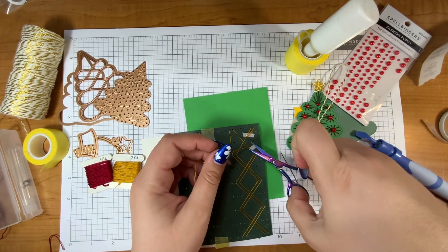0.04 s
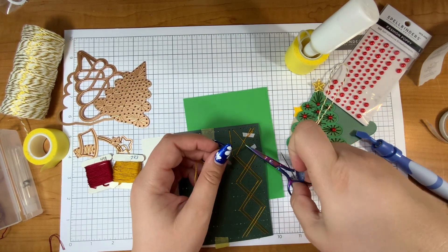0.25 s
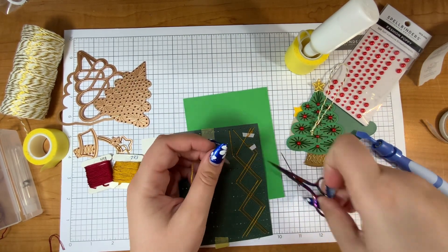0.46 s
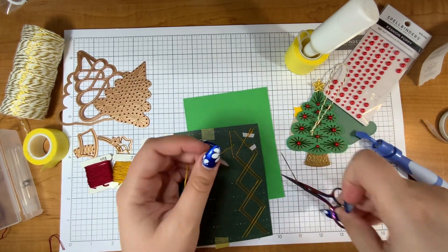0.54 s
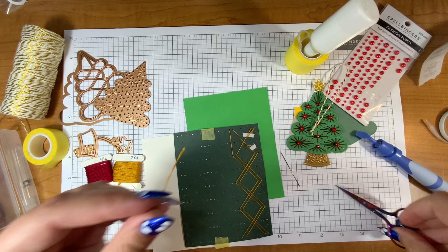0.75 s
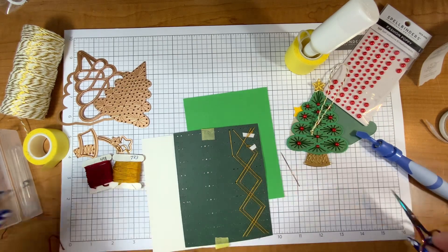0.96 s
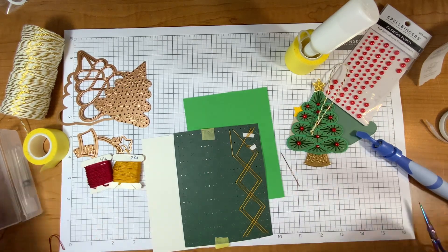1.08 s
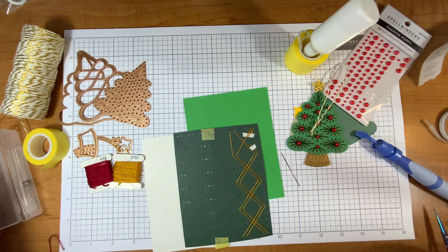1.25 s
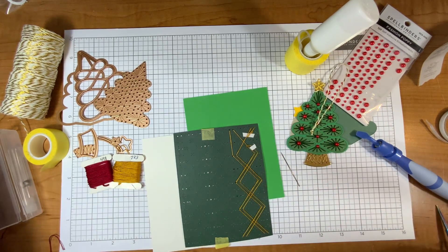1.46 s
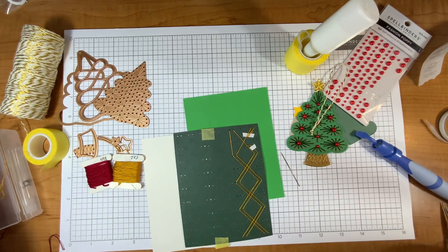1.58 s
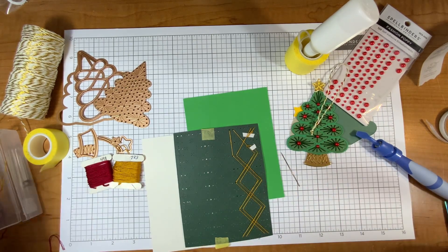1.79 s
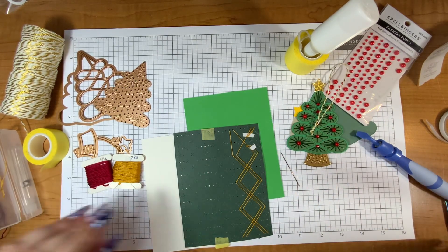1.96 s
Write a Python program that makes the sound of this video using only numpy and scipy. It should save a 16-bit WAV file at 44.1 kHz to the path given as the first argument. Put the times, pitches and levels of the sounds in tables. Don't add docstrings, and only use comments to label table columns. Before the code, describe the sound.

A sharp scissor snip, quiet dull bumps and faint paper rubbing lead to scissors dropped on a wooden craft table, clashing and rattling briefly; small indoor room, close microphone, low rumble and hiss, overloaded impact.

```python
import sys
import numpy as np
from scipy import signal
from scipy.fft import rfft, irfft
from scipy.io import wavfile
from scipy.ndimage import uniform_filter1d

SR = 44100
rng = np.random.default_rng(int(sys.argv[2]) if len(sys.argv) > 2 else 0)


def boost(x):
    u = np.asarray(x, float) / 20
    return 10 ** u


def log_audio(samples):
    frames = np.atleast_2d(samples).T
    limited = np.clip(frames, -1, 1)
    pcm = np.round(limited * 32767).astype(np.int16)
    wavfile.write(sys.argv[1], SR, pcm)


N = 89302

# t/s, tap level/dB, tap decay/s, top ring/dB, arm sway/dB
BUMPS = [(0.22, -45.5, 0.011, -51, -32.5), (0.428, -57, 0.018, -55.5, -43), (0.591, -54, 0.016, -51, -56),
         (0.65, -45.5, 0.0031, -36, -26.5), (0.329, -62, 0.0095, -66, -37.5),
         (0.756, -52.5, 0.012, -79, -33), (0.896, -66, 0.0099, -76, -42),
         (0.971, -45.5, 0.0056, -70, -52.5), (1.041, -27, 0.0052, -33.5, -21.5),
         (1.098, -41, 0.0067, -42, -48), (1.1833, -32.5, 0.0083, -38.5, -22.5),
         (1.296, -67, 0.0077, -49, -36), (1.337, -31.5, 0.0096, -34, -30.5),
         (1.342, -41.5, 0.011, -46, -38.5), (1.364, -43, 0.0035, -41.5, -29.5),
         (1.442, -43, 0.012, -46.5, -49), (1.464, -43.5, 0.0046, -52, -37), (1.54, -57, 0.015, -56, -35),
         (1.5826, -37.5, 0.0079, -47, -41.5), (1.596, -41, 0.018, -26.5, -34.5),
         (1.681, -30.5, 0.0068, -33.5, -24), (1.706, -27, 0.0073, -31, -48)]
# t/s, clash level/dB, decay/s, loudest pitch f/Hz, treble tilt/(dB/octave)
BOUNCES = [(1.719, -4.5, 0.0037, 4940, -0.5), (1.7213, -8, 0.004, 2920, -1),
           (1.732, 5.5, 0.0024, 7530, -3.5), (1.734, 0, 0.002, 2190, -4), (1.7388, -2, 0.0021, 2330, -3),
           (1.743, -13.5, 0.0033, 3040, -8), (1.7477, -17, 0.0022, 3800, 6), (1.753, -11, 0.003, 7100, 3),
           (1.75550, -3.5, 0.0021, 2300, -1), (1.7639, -12.5, 0.0039, 3040, -17),
           (1.7687, -6, 0.0041, 7560, -4), (1.778, -5.5, 0.0034, 3000, -5),
           (1.7870, -11.5, 0.0032, 2880, 0), (1.796, -13.5, 0.0035, 2000, -4),
           (1.804, -18, 0.0027, 1640, -9), (1.8062, -15, 0.0034, 1640, -11), (1.81, -22, 0.0082, 2130, -9),
           (1.817, -13.5, 0.0027, 2140, -22), (1.8237, -14.5, 0.0031, 1720, -12),
           (1.828, -17.5, 0.0025, 2370, -14), (1.831, -14, 0.0039, 2860, -11),
           (1.8374, -22.5, 0.0048, 2230, -16), (1.8433, -26.5, 0.0032, 2900, -11),
           (1.848, -24.5, .004, 2860, -9), (1.86, -48, 0.0025, 2400, -5), (1.864, -48, 0.0026, 1900, -7)]


def noise():
    return rng.standard_normal(N)


def colour(x, points):
    p, f = np.array(points, float), np.fft.rfftfreq(len(x), 1 / SR)
    gain_db = np.interp(np.log(f + 1), np.log(p[:, 0]), p[:, 1])
    return irfft(rfft(x) * boost(gain_db), len(x))


def unit(x):
    return x / np.sqrt(np.mean(x ** 2))


def band(x, hz, width_hz):
    return signal.lfilter(*signal.iirpeak(min(hz, 0.45 * SR), hz / width_hz, SR), x)


def ring(x, hz, t60_s):
    pole = np.exp((2j * np.pi * hz - np.log(1000) / t60_s) / SR)
    return signal.lfilter([1], [1, -pole], x).imag


def knocks(times_s, levels_db):
    x = np.zeros(N)
    np.add.at(x, (np.array(times_s) * SR).astype(int), boost(np.array(levels_db)))
    return x


def burst(start_s, decay_s, level_db):
    u = (np.arange(N) / SR - start_s) / decay_s
    rise = 1 - np.exp(-12 * np.abs(u))
    return boost(level_db) * (u > 0) * rise * np.exp(-np.abs(u))


def grit(spread_db, size):
    steps = boost(spread_db * rng.standard_normal(N // size + 1))
    return unit(steps.repeat(size)[:N])


def resonant(modes, gate=1):
    n, out = noise(), 0
    for k, (hz, width_hz, db) in enumerate(modes):
        steady = band(band(n, hz, width_hz), hz, width_hz)
        gated = band(band(gate * n, hz, width_hz), hz, width_hz)
        out = out + (-1) ** k * boost(db) * gated / np.std(steady)
    return out / np.sqrt(sum(boost(2 * db) for _, _, db in modes))


def hiss():
    # f/Hz, density/(dB/Hz)
    spectrum = [(20, -9), (45, 7.5), (80, 3), (160, -9.5), (290, -14), (600, -22.5), (1230, -24.5),
                (15400, -33)]
    return boost(-45) * unit(colour(noise(), spectrum))


def room(x):
    level_db, delay_s = -8.5, 0.004
    low_t60_s, high_t60_s = 0.31, 0.12
    late_db, late_t60_s = -13, 0.44
    t = np.arange(SR // 2) / SR
    n = rng.standard_normal(len(t))
    low = colour(n, [(4000, -21.0), (9000, -7.0)])
    near = low * boost(-60 * t / low_t60_s) + (n - low) * boost(-60 * t / high_t60_s)
    far = colour(n, [(500, 7.5), (3000, -3.5), (9800, -5), (11000, -42)])
    tail = (near + boost(late_db - 60 * t / late_t60_s) * far) * (t > delay_s)
    return boost(level_db) * signal.fftconvolve(x, tail / np.sqrt(np.sum(tail ** 2)))[:N]


def slide():
    # t/s, level/dB
    strokes = [(.38, -80), (.44, -83), (.52, -95), (.62, -61), (.8, -75), (1.0, -73), (1.1, -56),
               (1.3, -55.5), (1.449, -59), (1.548, -61), (1.698, -62), (2.0, -81)]
    flicker_db = 2 * unit(uniform_filter1d(noise(), size=500))
    p = np.array(strokes)
    level_db = np.interp(np.arange(N) / SR, p[:, 0], p[:, 1], left=-90) + flicker_db
    return boost(level_db) * resonant([(1754, 480, 0), (2900, 1200, -5), (900, 700, -9)])


def arm_sway():
    # t/s, level/dB
    drop_shoves = [
        (1.717, -18),
        (1.735, -23.5),
        (1.752, -32),
        (1.89, -33.5),
        (1.943, -42.5),
    ]
    hz, tau_s, onset = 42.35, 0.027, 1.55
    shoves = np.array([(b[0], b[4]) for b in BUMPS] + drop_shoves)
    push = knocks(*shoves.T)
    t = np.arange(SR // 2) / SR
    u = t / tau_s / onset
    swing = (u * np.exp(1 - u)) ** onset * np.cos(2 * np.pi * hz * t) * np.sqrt(2)
    return signal.fftconvolve(push, swing)[:N] + boost(-13) * ring(push, 76.4, 0.57)


def top_modes():
    # f/Hz, level/dB, t60/s
    modes = [(177, -18, 0.041), (226.6, -2, 0.16), (266.7, -25, 0.72), (395.3, -4, 0.29),
             (488.4, -4.5, 0.22), (700, 1, 0.13)]
    bump_db, bounce_db, contact_s = 0, -15.5, 0.0013
    rows = np.array(BUMPS + BOUNCES)
    offset_db = np.where(rows[:, 0] < BOUNCES[0][0], bump_db, bounce_db)
    sharp = knocks(rows[:, 0], rows[:, 1] + offset_db)
    t = np.arange(SR // 2) / SR
    contact = t * np.exp(-2 * t / contact_s)
    soft = signal.fftconvolve(sharp, contact / contact.sum())[:N]
    boom = ring(knocks([BOUNCES[8][0]], [-31]), 123, 0.82)
    return boom + sum((-1) ** k * boost(db) * ring(soft, hz, t60_s) for k, (hz, db, t60_s) in enumerate(modes))


def top_pair():
    hz, split_hz, t60_s = 368.6, 13.4, 0.29
    t = np.arange(SR // 2) / SR
    swell = np.sin(np.pi * np.minimum(split_hz * t, 1)) * boost(-60 * t / t60_s)
    hit = knocks(*np.array(BUMPS)[:, [0, 3]].T)
    return 2 * signal.fftconvolve(hit, swell * np.sin(2 * np.pi * hz * t))[:N]


def top_drum():
    # t/s, level/dB, pitch f/Hz
    drum = [(1.72, -39, 386.3), (1.733, -20, 384.6), (1.759, -12, 370.5), (1.783, -21.5, 361.5),
            (1.798, -16.5, 356), (1.824, -18, 362.7), (1.851, -20.5, 368.6), (1.888, -31.5, 368),
            (1.94, -58.5, 376)]
    d, t = np.array(drum), np.arange(N) / SR
    level_db = np.interp(t, d[:, 0], d[:, 1], left=-120, right=-120)
    phase = 2 * np.pi * np.cumsum(np.interp(t, d[:, 0], d[:, 2])) / SR
    return np.sqrt(2) * boost(level_db) * np.sin(phase)


def taps():
    # f/Hz, width/Hz, level/dB
    tap_modes = [(215.7, 126, 1.5), (450, 150, 1.5), (1020, 610, -6.5), (2300, 1520, 0), (3500, 3200, -9.5),
                 (4770, 760, -9.5), (7600, 4800, -16.5)]
    # t/s, level/dB, f/Hz, t60/s
    pings = [(.228, -40, 130, .15), (.651, -47, 870, .02), (.652, -48, 1450, .015), (.655, -38, 225, .12),
             (1.045, -38, 480, .1), (1.052, -39, 2110, .02), (1.059, -44, 3140, .02),
             (1.1035, -37, 1850, .025), (1.187, -38, 3400, .025), (1.1875, -36, 2200, .02),
             (1.339, -38, 4750, .03), (1.340, -38, 980, .04), (1.343, -31, 710, .05),
             (1.3445, -33, 2450, .025), (1.346, -25, 450, .075), (1.351, -38, 2280, .02),
             (1.356, -36, 2450, .02), (1.362, -32, 2325, .03), (1.368, -40, 1980, .02),
             (1.374, -40, 2250, .025), (1.461, -40, 1850, .043), (1.585, -39, 900, .04),
             (1.586, -44, 4500, .02), (1.5862, -34, 2400, .018), (1.587, -37, 480, .05),
             (1.596, -36, 2370, .025), (1.600, -42, 620, .09), (1.604, -40, 2420, .03),
             (1.612, -43, 2480, .03), (1.617, -44, 2260, .025), (1.6845, -35, 2200, .025)]
    grain = uniform_filter1d(grit(2.5, size=90), size=30)
    gate = grain * sum(burst(s, decay_s, db) for s, db, decay_s, _, _ in BUMPS)
    out = resonant(tap_modes, gate)
    for s, db, hz, t60_s in pings:
        out = out + band(ring(knocks([s], [db]), hz, t60_s), hz, hz / 3)
    return out


def blades():
    # t/s, level/dB, decay/s, centre f/Hz, share of blade ring/0-1
    clicks = [(0.2221, -14, 0.0007, 3270, 0.77), (.2222, -19, 0.001, 9100, 0.5),
              (0.2239, -19.5, 0.00066, 8000, 1), (0.2262, -28.5, 0.0048, 2550, 0.07),
              (.2295, -50, 0.0038, 3000, 0.3), (0.233, -46, 0.0047, 2650, .1),
              (0.857, -35, 0.0032, 6550, 0.01), (1.0961, -26.5, 0.003, 11000, 0.42),
              (1.0968, -31.5, 0.0019, 8600, 1)]
    # f/Hz, width/Hz, level/dB
    blade_modes = [(2600, 500, -6), (3100, 600, 2), (5300, 1200, -4), (8500, 1000, 2), (10000, 1300, -3),
                   (13900, 3000, -7)]
    out = 0
    for s, db, decay_s, hz, share in clicks:
        gate = burst(s, decay_s, db)
        plain = gate * unit(band(noise(), hz, hz))
        click = share * resonant(blade_modes, gate) + (1 - share) * plain
        out = out + band(click, hz, 0.75 * hz)
    return signal.sosfilt(signal.butter(3, 2100, "high", fs=SR, output="sos"), out)


def clashes():
    # f/Hz, level/dB
    clash_colour = [(180, -10.5), (300, -2.5), (850, -9), (2000, -4), (2900, -1.5), (4100, -6), (7600, -10),
                    (15400, -21.5)]
    peak_db, peak_width = -3, 0.35
    n = colour(noise() * grit(1.16, size=32), clash_colour)
    out = 0
    for s, db, decay_s, hz, tilt_db in BOUNCES:
        tilted = unit(colour(n, [(3500, 0.018), (14000, 2 * tilt_db)]))
        peak = unit(band(tilted, hz, peak_width * hz))
        out = out + burst(s, decay_s, db) * unit(tilted + boost(peak_db) * peak)
    return out


def steel_ring():
    # f/Hz, level/dB, t60/s
    modes = [(2035, -13, .6), (2196, -9, .5), (2390, -6, .22), (2509, -15, .4), (2826, -7, .52),
             (2960, -6, .35), (3270, -5, .38), (3370, -5, .44), (3690, -6, .42), (4000, -9, .42),
             (5090, -19, .55), (7400, -21, .6), (3520, -9, .4), (9173, -13, .36)]
    hit = knocks([BOUNCES[2][0]], [BOUNCES[2][1]])
    out = 0
    for hz, db, t60_s in modes:
        wobble = 1 + 0.4 * unit(uniform_filter1d(noise(), size=600))
        out = out + boost(db) * wobble * ring(hit, hz, t60_s)
    return boost(-29) * out


def scene():
    air = taps() + blades() + clashes() + steel_ring()
    table = top_modes() + top_pair() + top_drum() + arm_sway()
    mid = hiss() + room(air) + slide() + table + air
    side_colour = [(100, 11), (300, 2), (600, 9), (1500, 7), (3000, 3), (5000, -6), (9000, 4), (10500, -40)]
    side = boost(-40) * np.roll(colour(mid, side_colour), 260)
    return np.array([mid + side, mid - side])


def band_limit(x):
    return signal.sosfilt(signal.butter(12, 15600, fs=SR, output="sos"), x)


def record(dry):
    clip = 1.0
    x = signal.sosfilt(signal.butter(2, 24.8, "high", fs=SR, output="sos"), dry)
    x = signal.sosfilt(signal.ellip(8, 0.2, 60, 15700, fs=SR, output="sos"), x)
    mid = x.mean(axis=0)
    return band_limit(x - mid + np.clip(mid, -clip, clip))


dry = scene()
out = record(dry)
log_audio(out)
```